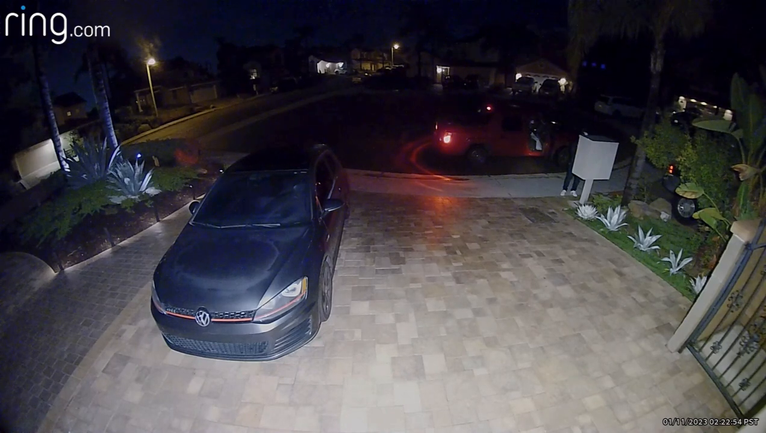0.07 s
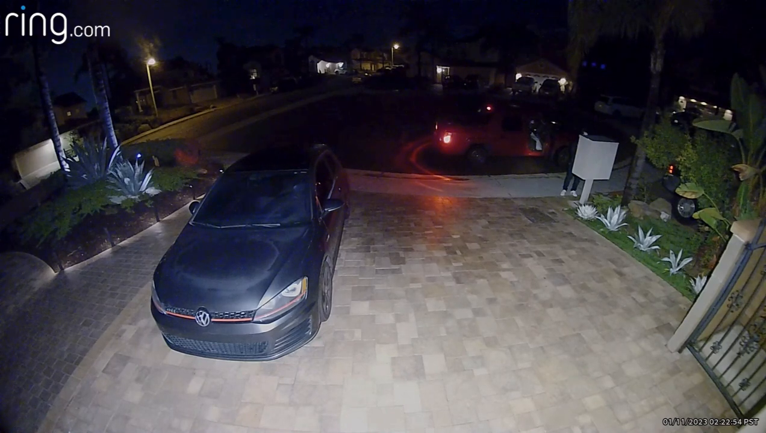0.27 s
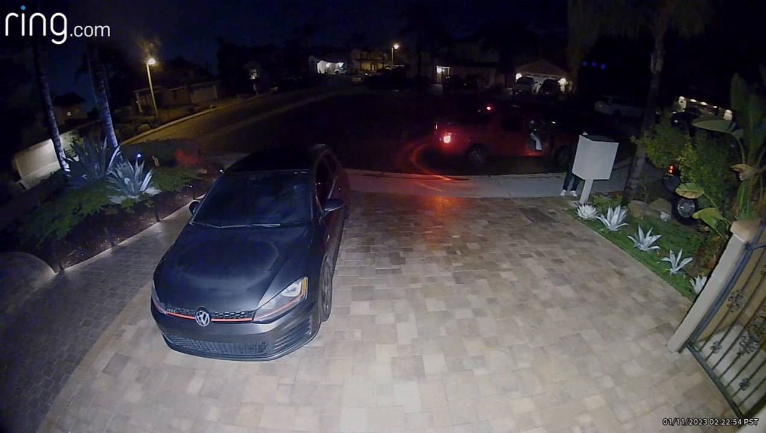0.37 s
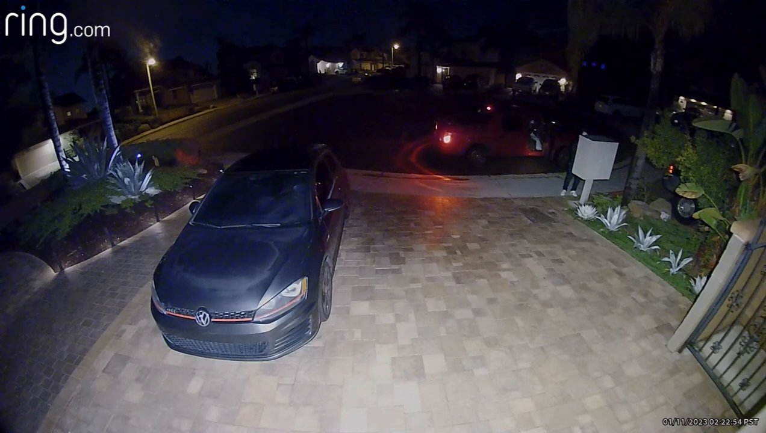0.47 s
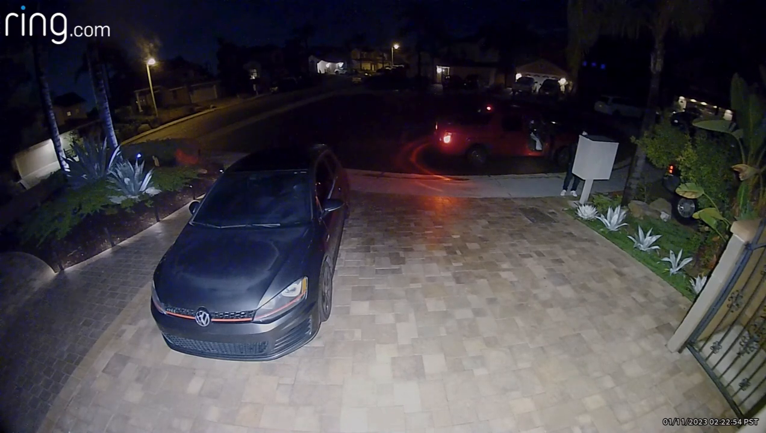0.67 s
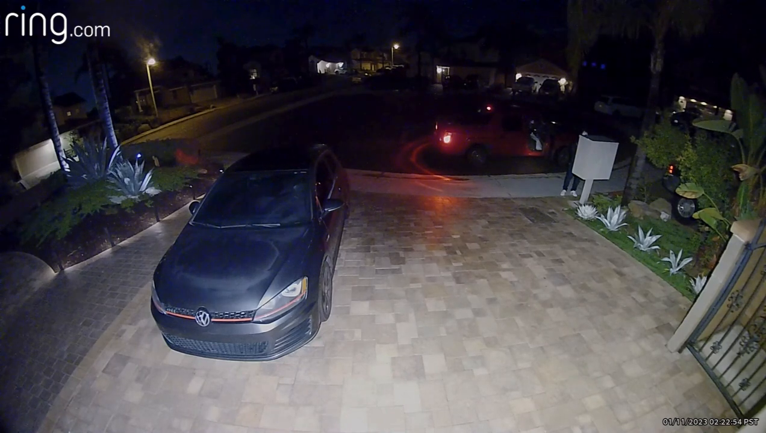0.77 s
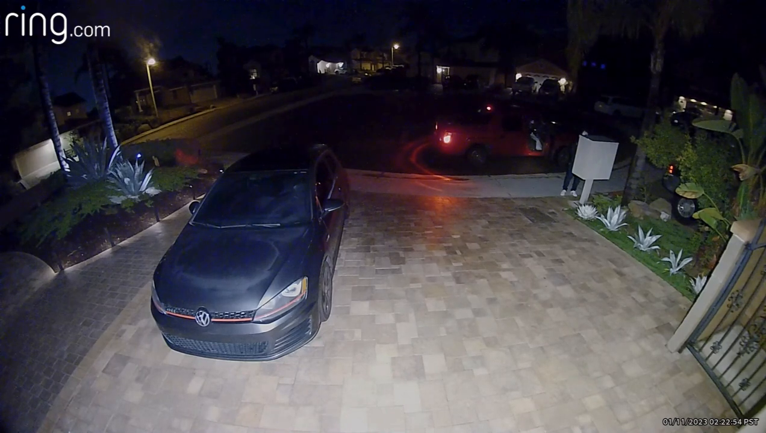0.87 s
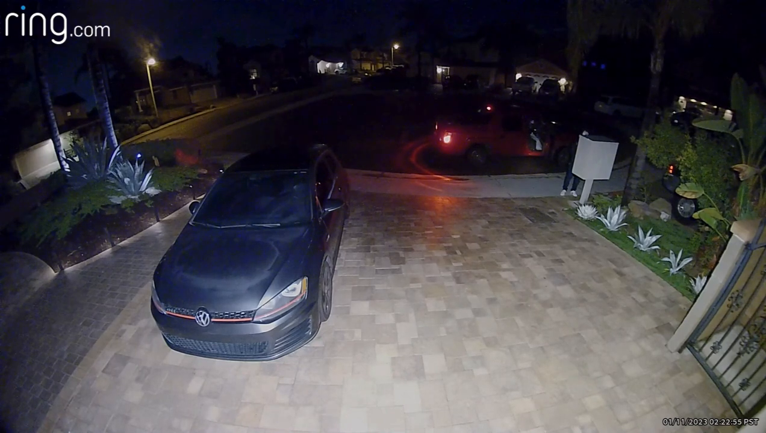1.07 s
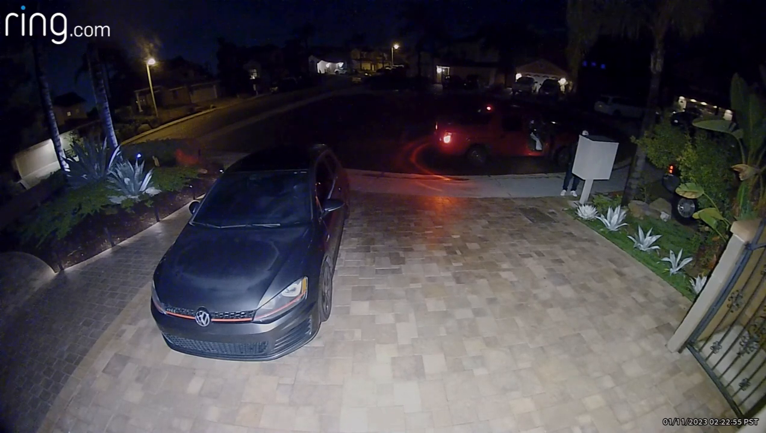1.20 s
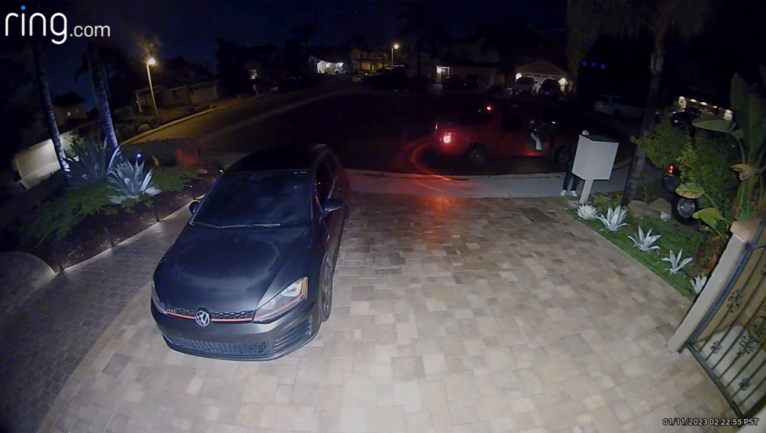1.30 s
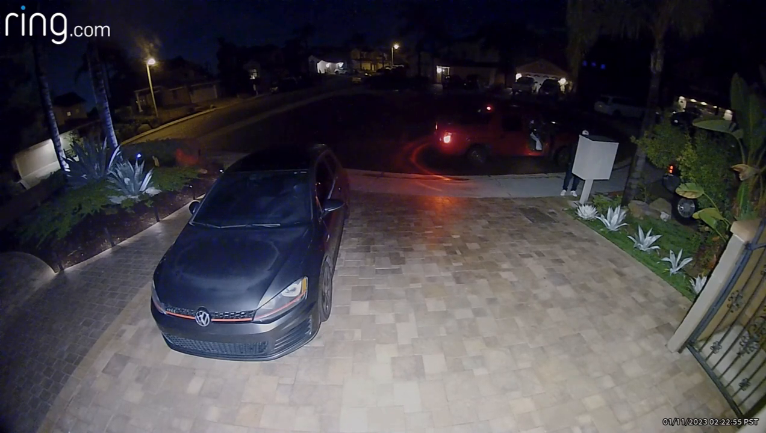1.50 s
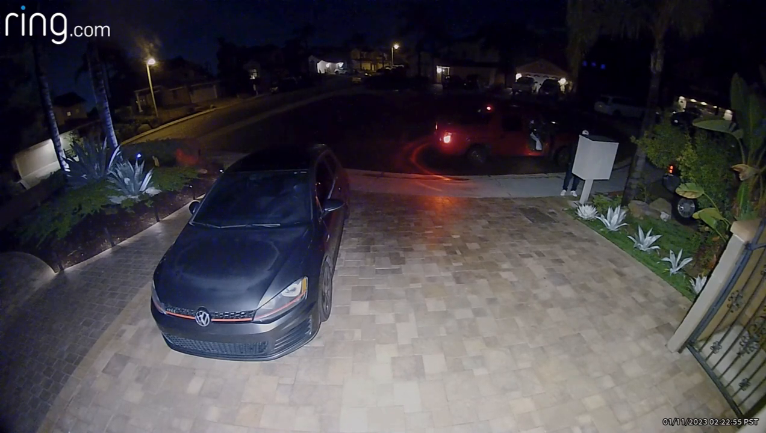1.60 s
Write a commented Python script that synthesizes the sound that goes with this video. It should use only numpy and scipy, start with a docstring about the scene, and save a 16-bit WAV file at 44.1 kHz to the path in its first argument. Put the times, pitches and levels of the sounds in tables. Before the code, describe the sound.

A sharp metallic bang on sheet metal overloads the microphone beside a steadily idling car outdoors

```python
"""Bang on sheet metal beside an idling car

A car idles on a residential street at night: patchy, wavering coloured noise under a thin engine whine.
A quick run of blows hits sheet metal, each a crackling noise rush plus ringing panel modes, and overloads
the small outdoor camera microphone's recorder. Echoes from the house fronts follow with a short falling
chirp, over a fading noise wash, and the bang sinks into the engine noise."""
import sys
import numpy as np
from scipy import signal
from scipy.fft import rfft, irfft
from scipy.io import wavfile

SR = 44100
rng = np.random.default_rng(int(sys.argv[2]) if len(sys.argv) > 2 else 0)


def dump_mix(stems):
    """Bounce the given channels to the path in sys.argv[1] as a 16-bit WAV at rate SR."""
    frames = np.atleast_2d(stems).T  # one column per channel
    limited = np.clip(frames, -1, 1)  # hard clip at full scale
    pcm = np.round(limited * 32767).astype(np.int16)
    wavfile.write(sys.argv[1], SR, pcm)


N = 72765
T = np.arange(N) / SR

# colour of the house-front echoes and the street wash: freq_hz [Hz], level_db [relative dB per Hz]
ECHO_COLOUR = [(100, -28), (330, -14), (600, -1), (1020, 5.5), (1500, -28), (2560, 10), (3000, -2.5),
               (3400, -13.5), (4200, -34), (5700, -5), (6300, -8), (7500, -49)]


def amp(db):
    """Turn decibels into gain."""
    return 10 ** (np.asarray(db) / 20)


def rms_one(x):
    """Scale a signal to rms 1."""
    return x / np.sqrt(np.mean(x ** 2) + 1e-20)


def coloured(x, points, tilt_db=0.):
    """Filter by a spectrum joined on a log-frequency axis, tilted in dB per octave about 2 kHz."""
    hz = np.maximum(np.arange(len(x) // 2 + 1) * SR / len(x), 10)
    point_hz, point_db = np.transpose(points)
    db = np.interp(np.log(hz), np.log(point_hz), point_db)
    db = db + tilt_db * np.log2(np.clip(hz, 200, 8000) / 2000)  # the tilt stops at 200 Hz and 8 kHz
    return irfft(rfft(x) * amp(db), len(x))


def drift(rate_hz):
    """Slow random wander of spread 1: noise through a two-pole lowpass, computed every 40 samples."""
    step = 40
    pole = np.exp(-2 * np.pi * rate_hz * step / SR)
    noise = rng.standard_normal(N // step + 2002)
    slow = signal.lfilter([1], [1, -2 * pole, pole * pole], noise)[2000:]  # drop the filter's settling
    return np.interp(np.arange(N) / step, np.arange(len(slow)), rms_one(slow - slow.mean()))


def burst(t, rise_s, t60_s):
    """Envelope of a struck sound: quick rise, then exponential fall by 60 dB per t60; silent before 0."""
    t = np.maximum(t, 0)
    return (1 - np.exp(-t / rise_s)) * amp(-60 * t / t60_s)


def idle():
    """Engine idle and night air through the microphone's resonances: octave-wide patches waver on their own."""
    # colour of the idle: freq_hz [Hz], level_db [relative dB per Hz]
    idle_colour = [(25, -18.5), (55, -8), (140, -10), (240, -4), (350, 0), (450, -5), (700, -11),
                   (1070, -7.5), (1750, -9.5), (2030, -12.5), (2280, -8.5), (2600, -5), (2950, -12.5),
                   (3350, -7.5), (3650, -15), (3950, -18), (4800, -19), (5500, -13.5), (6250, -12.5),
                   (6600, -20.5), (7100, -26), (7700, -28.5), (8200, -36), (8500, -40)]
    # loudness over time: time_s [s], level_db [dB rms]
    idle_level = [(0.0, -28.5), (0.27, -29), (0.44, -29.5), (1.382, -30.5), (1.65, -30.5)]
    patch_spread_db, patch_rate_hz = .6, 9.3

    spectrum = rfft(coloured(rng.standard_normal(N), idle_colour))
    octave = np.log2(np.maximum(np.arange(N // 2 + 1) * SR / N, 20) / 20)  # octaves above 20 Hz
    patches = 0
    for k in range(11):
        share = np.clip(1 - np.abs(octave - k), 0, 1)  # overlapping triangles
        patches = patches + irfft(spectrum * share, N) * amp(patch_spread_db * drift(patch_rate_hz))
    return amp(np.interp(T, *np.transpose(idle_level))) * rms_one(patches)


def whine():
    """Thin engine whine: a faint sine that wavers in pitch and strength."""
    # strength before the waver: time_s [s], level_db [dB peak]
    whine_level = [(0, -38.5), (.5, -41.5), (.85, -43), (1.0, -39), (1.15, -41), (1.3, -43), (1.65, -46)]
    pitch_hz, waver_hz, waver_db = 2605, 25.4, 1.5

    hz = pitch_hz + waver_hz * drift(4.4)
    level_db = np.interp(T, *np.transpose(whine_level)) + waver_db * drift(7)
    return amp(level_db) * np.sin(2 * np.pi * np.cumsum(hz) / SR)


def panel(pitch_hz, size):
    """One strike on sheet metal: every mode rings and dies, those far from the favoured pitch weaker."""
    # nominal pitch of each panel mode: mode_hz [Hz]
    modes_hz = [290, 400, 562, 730, 912, 1030, 1790, 2530, 2940, 3372, 3570, 5170, 5645, 5860, 6117, 6280]
    # ring of each mode, in the same order: level_db [relative dB], t60_s [s]
    mode_rings = [(-8.5, .08), (-2.5, .08), (-3, 0.088), (0.5, 0.073), (0, 0.092), (-5.5, 0.11), (4, .07),
                  (-3.5, 0.13), (-7.5, 0.08), (2.5, 0.07), (2, 0.094), (-1, 0.066), (2.5, 0.054),
                  (-11, 0.032), (6.5, .05), (4, .05)]
    falloff_db_per_octave, detune_share, uneven_db = 19.5, .008, 1.1

    t = np.arange(size) / SR
    hz = np.array(modes_hz)[:, None]
    db, t60_s = np.transpose(mode_rings)[:, :, None]
    hz = hz * (1 + detune_share * rng.standard_normal(hz.shape))  # each strike is slightly detuned
    db = db - falloff_db_per_octave * np.abs(np.log2(hz / pitch_hz))
    db = db + rng.normal(0, uneven_db, hz.shape)
    tones = np.sin(2 * np.pi * (hz * t + rng.random(hz.shape)))  # random starting phases
    return np.sum(amp(db) * burst(t, .002, t60_s) * tones, axis=0)


def arrivals(rows, colour, rise_s, t60_s, size=16384):
    """Each arrival is a dying, crackling rush of noise with its own level and tilt, plus a panel ring."""
    crackle_db, crackle_per_s = 2.5, 250  # spread and rate of the uneven grain

    out = np.zeros(N + size)
    t = np.arange(size) / SR
    for start_s, level_db, tilt_db, pitch_hz, ring_db in rows:
        grain = np.interp(t * crackle_per_s, np.arange(size), rng.standard_normal(size))
        noise = coloured(rng.standard_normal(size), colour, tilt_db)
        rush = rms_one(noise * amp(crackle_db * grain)) * burst(t, rise_s, t60_s)
        i = int(start_s * SR)
        out[i:i + size] += amp(level_db) * rush + amp(ring_db) * panel(pitch_hz, size)
    return out[:N]


def bang():
    """A quick run of blows on sheet metal, each with a fast-dying noise rush and its own favoured ring."""
    # blows: start_s [s], level_db [dB rms of the rush before its envelope], tilt_db [dB per octave about 2 kHz],
    # pitch_hz [Hz, near which the panel rings most], ring_db [dB gain of the ring]
    blows = [(.1015, -17.5, -0.5, 2540, -19), (.1045, -18, -3, 1030, -14), (.1075, 2.5, 6, 3400, -3.5),
             (.111, -16, 18, 725, -9), (.121, 4, 1, 6100, -4.5), (.129, -3, -1, 6100, -9.5),
             (.134, -5, -0.5, 915, -4.5), (.138, -8.5, 0.5, 2540, -6), (.144, -7, -0.5, 560, -5),
             (.149, -26.5, -8.5, 400, -12), (.153, -7.5, 0, 3500, -21), (.164, -14.5, -3.5, 1790, -20),
             (.171, -21.5, -3.5, 5570, -16.5), (.174, -23, -7, 290, -23), (.178, -18.5, -3.5, 910, -21),
             (.187, -22, 2, 2500, -21)]
    # broad colour of the bang: freq_hz [Hz], level_db [relative dB per Hz]
    bang_colour = [(60, -38.5), (120, -18.5), (300, -14.5), (560, -11), (900, -14.5), (1260, -15),
                   (1780, -11.5), (2050, -11.5), (2560, -5), (3000, -10), (3500, -13), (4250, -18),
                   (4700, -16.5), (5300, -8), (6080, -1), (6600, -10.5), (7200, -24.5), (8200, -31)]
    return arrivals(blows, bang_colour, rise_s=0.0017, t60_s=0.069)


def street_tail():
    """Diffuse street reverberation: a slowly fading wash of noise in the colour of the echoes."""
    start_s, level_db, t60_s = .2, -35.5, 1.3
    wash = rms_one(coloured(rng.standard_normal(N), ECHO_COLOUR))
    return amp(level_db) * burst(T - start_s, 0.01, t60_s) * wash


def echoes():
    """The bang returns from the house fronts: quieter, more slowly dying rushes, each with a faint panel ring."""
    # echoes: start_s [s], level_db [dB rms of the rush before its envelope], tilt_db [dB per octave about 2 kHz],
    # pitch_hz [Hz, near which the panel rings most], ring_db [dB gain of the ring]
    returns = [(.229, -22, 3.3, 2540, -23), (.246, -22, -1.2, 2540, -22), (.268, -25.5, -2, 2540, -24),
               (.29, -34, -1, 2570, -21.5), (.302, -27, 0.57, 3440, -41), (.316, -26.5, 1.4, 2540, -31),
               (.326, -27.5, 1.3, 2540, -34), (.36, -35.5, -1.5, 5640, -30.5),
               (.39, -39.5, -5, 3375, -34.5), (.47, -33, 7, 2540, -24.5)]
    return arrivals(returns, ECHO_COLOUR, rise_s=0.0015, t60_s=0.14)


def chirp():
    """A brief sine sliding down among the echoes, swelling and fading as a half sine."""
    start_s, length_s, level_db = .288, .022, -26
    from_hz, to_hz = 1300, 920

    progress = np.clip((T - start_s) / length_s, 0, 1)
    hz = from_hz + (to_hz - from_hz) * progress
    return amp(level_db) * np.sin(np.pi * progress) * np.sin(2 * np.pi * np.cumsum(hz) / SR)


def scene():
    """Mix engine, whine, bang, street wash, echoes and chirp at one microphone."""
    engine = idle() + whine()
    return (engine + bang() + street_tail() + echoes() + chirp())[None]


def record(dry):
    """The camera's band limit comes first; clipping then sprays treble above it, up to the final cut-off."""
    camera_cut_hz, cutoff_hz = 8450, 16000
    clip_top, clip_knee = .67, 5.0  # full-scale ceiling; a higher knee bends more sharply

    band_limit = signal.ellip(12, .5, 85, camera_cut_hz, fs=SR, output="sos")
    x = signal.sosfilt(band_limit, dry)
    x = x / (1 + np.abs(x / clip_top) ** clip_knee) ** (1 / clip_knee)
    taps = signal.firwin(511, cutoff_hz - 120, window=("kaiser", 8), fs=SR)
    return signal.fftconvolve(x, taps[None], mode="same")


dry = scene()
out = record(dry)
dump_mix(out)
```